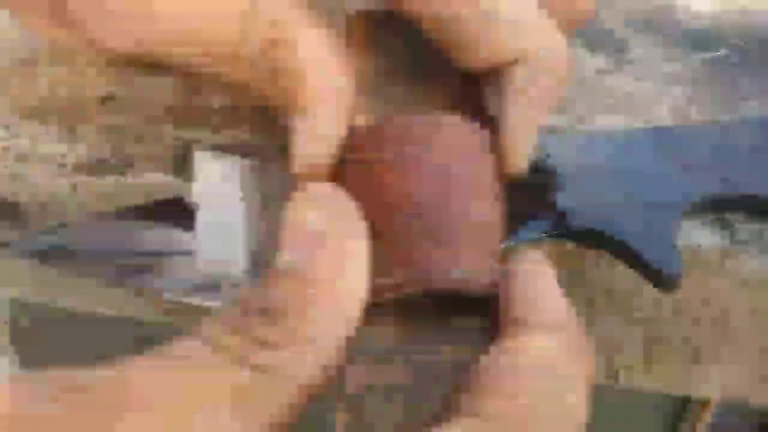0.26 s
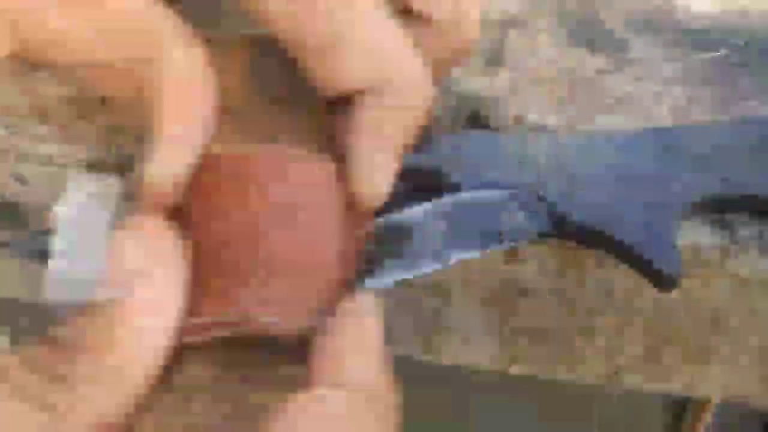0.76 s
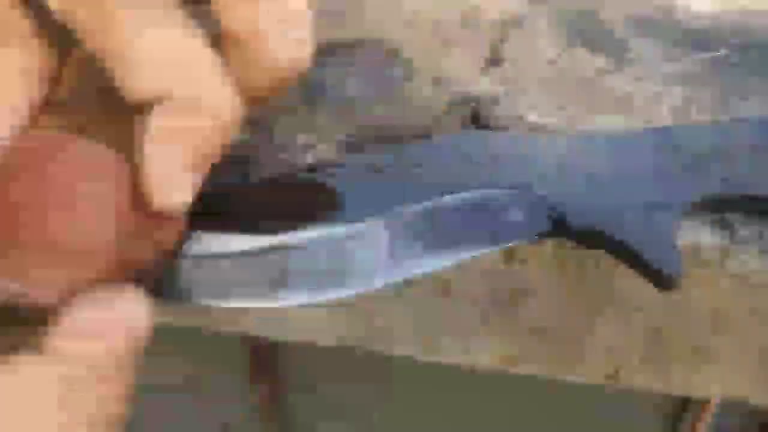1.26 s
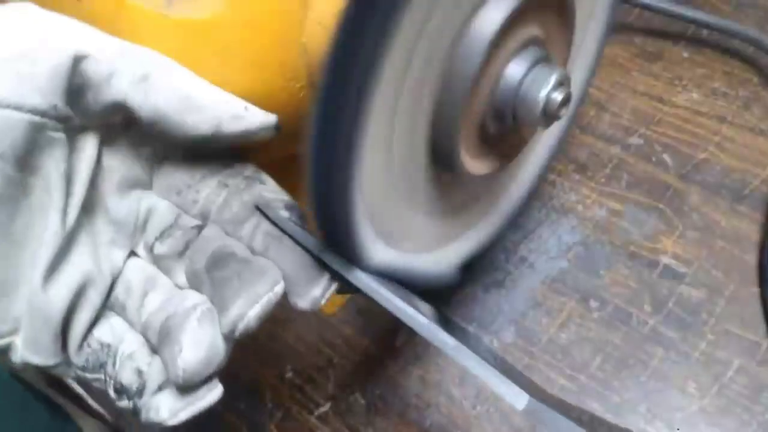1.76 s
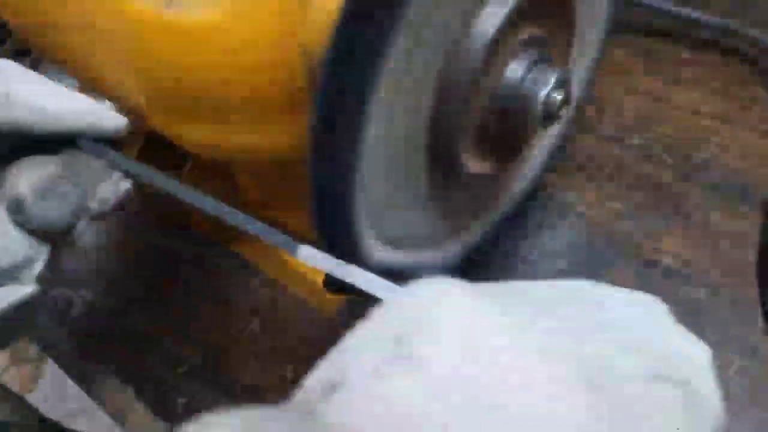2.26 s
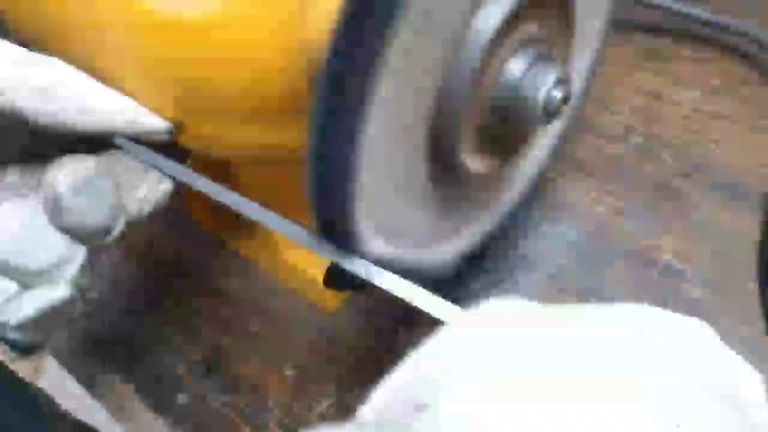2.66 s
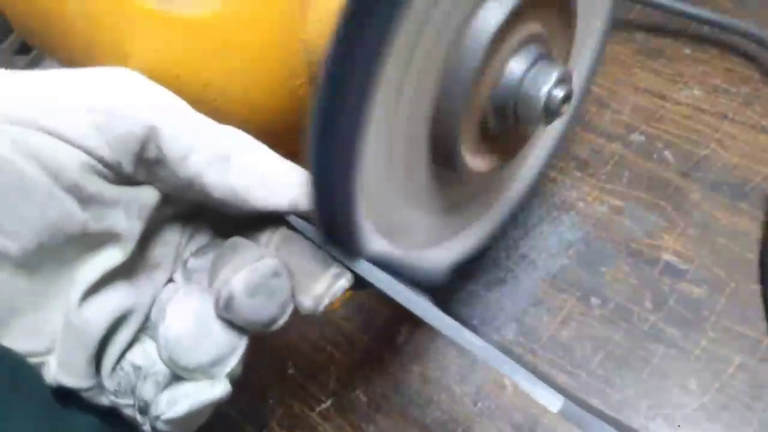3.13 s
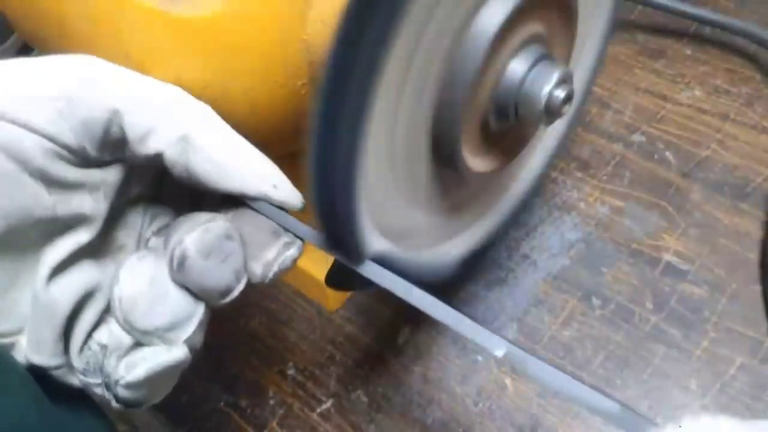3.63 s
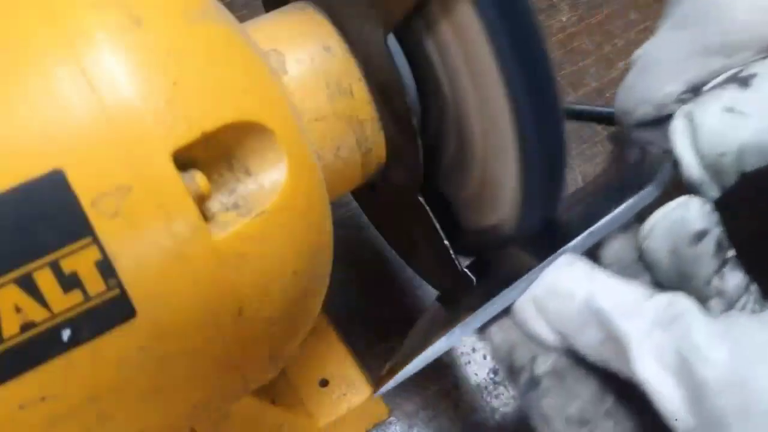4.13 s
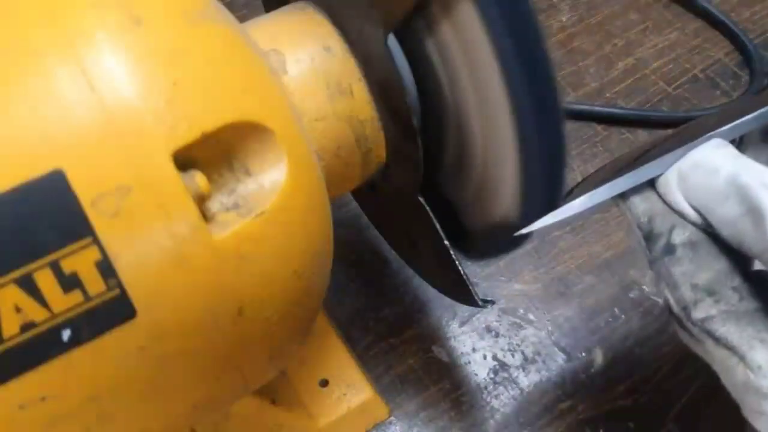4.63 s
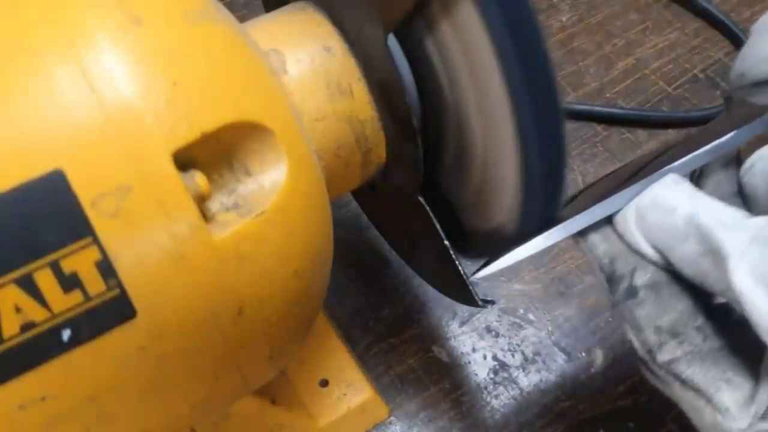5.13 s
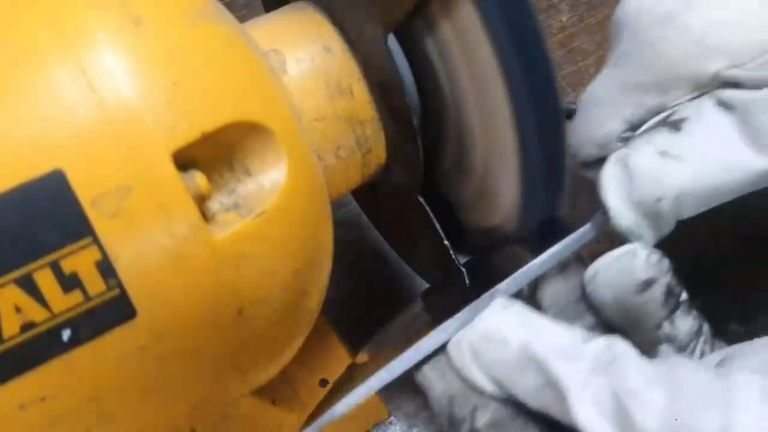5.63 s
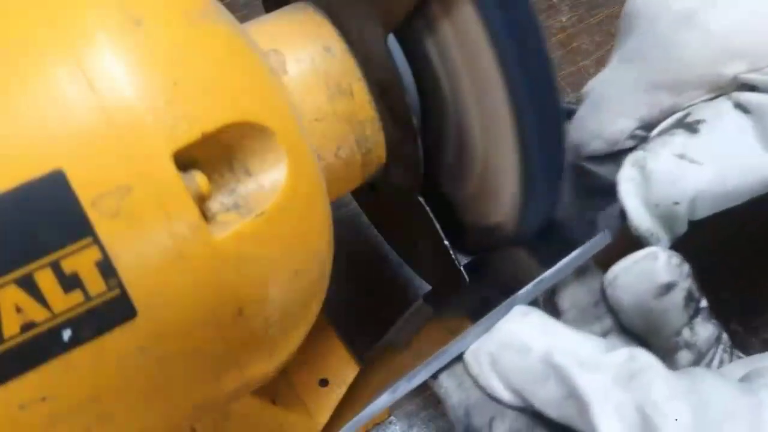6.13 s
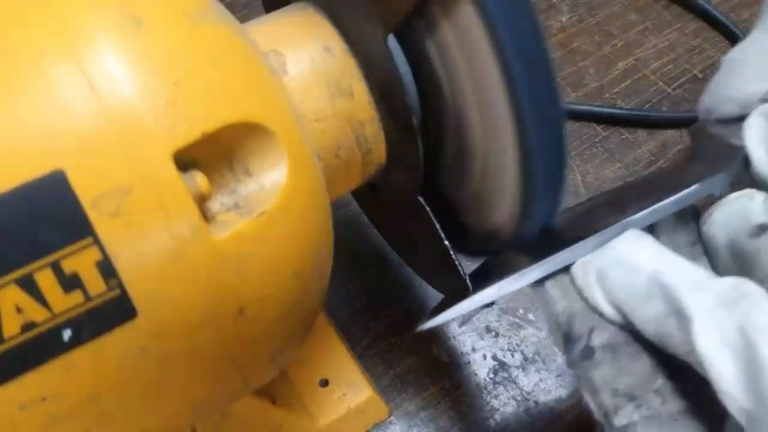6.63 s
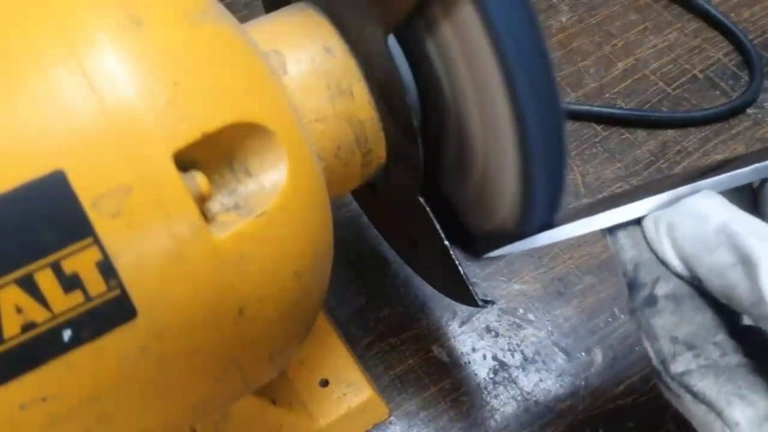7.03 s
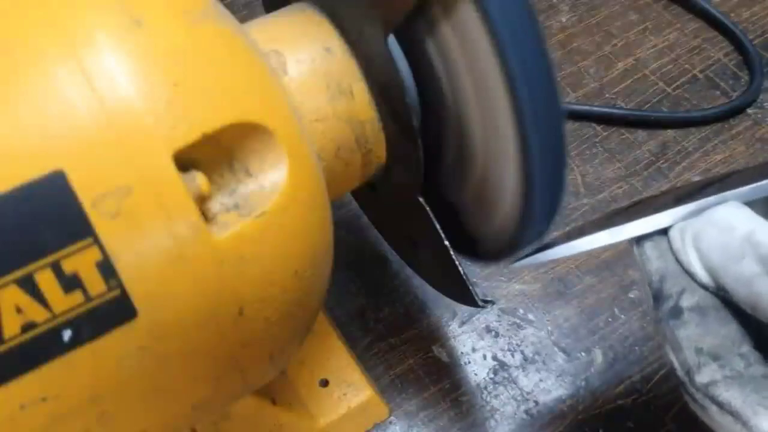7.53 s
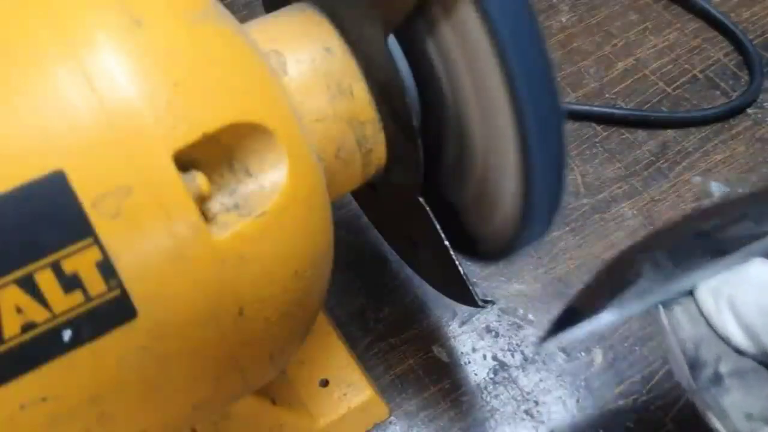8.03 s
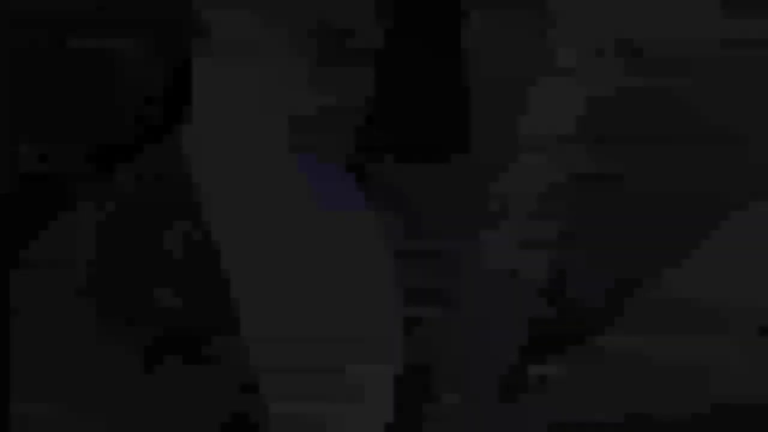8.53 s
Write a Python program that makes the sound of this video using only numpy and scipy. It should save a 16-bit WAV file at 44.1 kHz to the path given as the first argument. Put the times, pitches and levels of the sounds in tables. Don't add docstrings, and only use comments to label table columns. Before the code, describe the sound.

From 0 to 1.46 seconds, sandpaper is rubbed very fast along a clamped steel blade: short, dry, high hissing strokes about every 0.05 seconds, stopping sharply, with small catches and a faint low yard murmur. At 1.48 it cuts to a close bench microphone beside a buffing wheel. The blade drags on it with a rough buzz repeating about 73 times a second, metallic ringing and hiss over low motor hum. Pressure eases near 2.5, returns brighter by 2.85, and drops briefly at 3.95. At 4.0 the sound jumps louder, from behind the wheel, with a hard knocking start, then a singing edge; it dips near 5.3 and swells lower and stronger from 5.7. The blade lifts about 7.5, with low bumps near 7.6 to 7.7. The wheel idles with hum, air and faint whine until 8.5. Quiet outdoor air follows, with wind thumps on the left at 8.64 and 8.76.

```python
import sys
import numpy as np
from scipy import signal
from scipy.fft import irfft
from scipy.io import wavfile
from scipy.ndimage import uniform_filter1d

SR = 44100
rng = np.random.default_rng(int(sys.argv[2]) if len(sys.argv) > 2 else 0)


def generate_wav(signal):
    frames = np.transpose(np.atleast_2d(signal))
    scaled = np.clip(frames, -1, 1) * 32767
    pcm = np.round(scaled).astype(np.int16)
    wavfile.write(sys.argv[1], SR, pcm)


def attenuation_scalar(level_db):
    decades = np.asarray(level_db, float) / 20
    return 10 ** decades


N = 387193
T = np.arange(N) / SR
CHANGE_S = 4.007
PORT_LAG_S = 3.5e-5


def evened(x, axis=None):
    return x / np.sqrt(np.mean(x ** 2, axis, keepdims=True) + 1e-20)


def read(points, hz):
    f, value = np.transpose(points)
    return np.interp(np.log(hz + 1), np.log(f + 1), value)


def bins_and_frames(size):
    hop = size // 4
    return np.fft.rfftfreq(size, 1 / SR)[:, None], np.arange(-(-N // hop) + 1) * hop / SR


def modes(rows, hz, widen):
    return sum(attenuation_scalar(db) ** 2 / (1 + (2 * (hz - f) / (w + widen)) ** 2) ** 2 for f, w, db in rows)


def patches(shape, bins, frames):
    chance = rng.standard_normal(shape[::-1]).T
    return evened(uniform_filter1d(uniform_filter1d(chance, bins, 0), frames, 1))


def blended(x, t, size):
    sides = (t < CHANGE_S - .02, t >= CHANGE_S - .02)
    return np.concatenate([uniform_filter1d(x[..., m], size, mode="nearest") for m in sides], -1)


def white():
    return rng.standard_normal((N, 2)).T


def heard(x, gain, same, pan_db, size):
    a, b = signal.stft(x, nperseg=size, noverlap=size * 3 // 4)[2]
    same = np.clip(same, -1, 1)
    hz = bins_and_frames(size)[0]
    lag_s = PORT_LAG_S * np.exp(-hz / 15000)
    twist = 1.2 * np.sin(hz / 420) * (hz > 2500)
    left = a * np.exp(-2j * np.pi * hz * lag_s + 1j * twist) * attenuation_scalar(pan_db / 2)
    right = (same * a + np.sqrt(1 - same ** 2) * b) * attenuation_scalar(-pan_db / 2)
    z = np.array([left, right]) * gain
    return signal.istft(z, nperseg=size, noverlap=size * 3 // 4)[1][:, :N]


# (pitch_hz, level_db per Hz)
OPEN_AIR = [(18, -28), (30, 5.5), (199, -8.5), (554, -23), (632, -26.5), (801, -36), (937, -21),
            (1190, -29), (1430, -41), (1900, -37), (2300, -44.5), (16000, -58)]
# (peak_s, level_db)
RUSTLES = [
    (8.58, -60),
    (8.71, -61),
    (8.76, -60),
]
RUSTLE_FADE = 1200


def outdoors():
    hz, t = bins_and_frames(size=512)
    air = evened(attenuation_scalar(read(OPEN_AIR, hz))) * attenuation_scalar(-53.5)
    dry_ring = evened(np.sqrt(modes([(950, 140, 3), (1260, 190, -8.5)], hz, 0)))
    rustle = dry_ring * sum(attenuation_scalar(db - RUSTLE_FADE * abs(t - s)) for s, db in RUSTLES)
    return heard(white(), air + rustle, 0.34, 7.2, size=512) * np.clip((T - 8.575) / 0.013, 0, 1)


# (centre_s, level_db, pitch_hz, length_cycles, left_right_db)
BUMPS = [
    (4.6, -61, 123, 4.6, 8),
    (7.591, -52.5, 142, 3.7, 7),
    (7.679, -45, 91, 4.4, 18),
    (7.722, -55, 109, 4.3, 14),
    (8.388, -51, 92, 6.6, 19),
]
# (centre_s, level_db, pitch_hz, length_cycles)
GUSTS = [
    (8.594, -50, 130, 2),
    (8.619, -38, 90, 2.5),
    (8.63, -32, 100, 1.5),
    (8.6388, -26, 190, 1.3),
    (8.6405, -43, 330, 1.8),
    (8.655, -45, 130, 2.5),
    (8.673, -49, 95, 3),
    (8.759, -33, 105, 3.5),
    (8.76, -46, 330, 3),
    (8.78, -42, 100, 2),
]
WIND_LEFT_DB, WIND_FULL_DB = 35, -38.5


def bumps():
    out = np.zeros((2, N))
    gusts = [(*w, WIND_LEFT_DB + min(w[1] - WIND_FULL_DB, 0)) for w in GUSTS]
    for s, db, hz, cycles, pan_db in BUMPS + gusts:
        u = (T - s) * hz
        swing = -2 * np.exp(-(2.5 * u / cycles) ** 2) * np.cos(2 * np.pi * u)
        out += attenuation_scalar(db - pan_db * np.c_[[0, 1]]) * swing
    return out


# (time_s, speed_turns_per_s)
SPEED = [(1.55, 73.6), (1.85, 73.35), (2.17, 72.3), (2.45, 73.9), (2.65, 73.0), (3, 71.8), (3.17, 72.7),
         (3.35, 72.0), (3.55, 71.6), (3.87, 70.0), (4.08, 71.1), (4.5, 72.8), (4.8, 73.95), (5.5, 73.75),
         (5.85, 72.55), (6.1, 73.2), (6.4, 73.4), (7.45, 75.05)]
IDLE_SPEED = 75.4


def turns():
    return np.cumsum(np.interp(T, *np.transpose(SPEED + [(7.65, IDLE_SPEED)]))) / SR


# (pitch_hz, likeness)
PLACE_SAME = [(60, 0.8), (180, 1), (550, 0.54), (1650, 0.088), (4970, 0.26), (15000, 0.24)]
# (shaft_order, level_db)
HUM = [(1, 3.5), (2, -5), (3, -16.5), (4, -5), (5, -11.5), (6, -7), (7, -22.5), (8, -15), (10, -19),
       (11, -22.5), (12, -12)]
# (time_s, hum_db, rush_db, hum_left_right_db, bench_buzz_db)
MOTOR = [
    (1.47, -85, -73, 2, -80),
    (1.62, -66.5, -57, -2.5, -70.5),
    (7.3, -63.5, -58.5, 1.5, -68.5),
    (8.3, -61.5, -60.5, 6, -76.5),
    (8.42, -59, -57, 4, -70.5),
]
# (pitch_hz, level_db per Hz)
RUSH = [(30, -2), (100, -0.5), (300, -3.5), (600, -4.5), (1200, -8.5), (3000, -10.5), (5000, -8.5),
        (6000, -17), (8500, -19), (11000, -19.5), (15500, -9), (16000, -39)]
# (pitch_hz, left_right_db)
RUSH_VIEW = [(60, -15), (110, 18), (200, -2.5), (380, 1), (700, 7.5), (1290, 3.5), (2380, 2.5), (4400, 1.5),
             (8120, 35), (15000, 12.5)]
# (pitch_hz, width_hz, level_db)
WHINE = [(7620, 330, -61), (5340, 200, -70), (6480, 120, -73), (9240, 180, -76), (12640, 390, -67.5)]
FREE_S, FREE_BUZZ_DB = 7.2, 16


def motor():
    s, hum_db, rush_db, pan_db, buzz_db = np.transpose(MOTOR)
    turn, hum = turns(), 0
    freed = FREE_BUZZ_DB * np.clip((T - FREE_S) / 0.14, 0, 1)
    for k, db in HUM:
        waver_db = 1.2 if k == 1 else 3.5
        waver = attenuation_scalar(waver_db * evened(uniform_filter1d(rng.standard_normal(N), size=12000)))
        level_db = np.interp(T, s, hum_db if k == 1 else buzz_db) + db + 4.6 * (k > 1)
        level_db = level_db + freed * ((k == 3) + .5 * (k == 5))
        hum += attenuation_scalar(level_db) * waver * np.sin(2 * np.pi * (k * turn + rng.random()))
    hum = np.sqrt(2) * hum * attenuation_scalar(np.interp(T, s, pan_db) * np.c_[[.5, -.5]])

    hz, t = bins_and_frames(size=1024)
    air_db = np.interp(t, s, rush_db)
    rush = evened(attenuation_scalar(read(RUSH, hz))) ** 2 * attenuation_scalar(air_db) ** 2
    whine = sum(evened(np.sqrt(modes([m], hz, 0))) ** 2 * attenuation_scalar(m[2]) ** 2 for m in WHINE)
    whine = whine * attenuation_scalar(air_db + 55.0) ** 2
    whine *= np.interp(t, [CHANGE_S, CHANGE_S + .01, 8.48, 8.52], [0.037, 1.0, 0.93, 0.021])
    gain = np.sqrt(rush + whine) * attenuation_scalar(2.0 * patches((len(hz), len(t)), 6, 12))
    gain *= attenuation_scalar(4.0 * np.minimum(patches((len(hz), len(t)), 3, 30), .5) * (hz < 450))
    air = heard(white(), gain, read(PLACE_SAME, hz), read(RUSH_VIEW, hz), size=1024)
    return (hum + air) * np.interp(T, [8.495, 8.53, 8.578, 8.584, 8.63], [1, .5, .4, .12, 0])


# (pitch_hz, level_db per Hz)
YARD = [(18, -68), (30, -18), (128, 10.5), (241, 17), (318, 12), (407, 3), (599, 5), (744, 0), (1200, 8.5),
        (1560, -34), (2640, -120)]
YARD_DB = -66


def yard():
    hz, t = bins_and_frames(size=2048)
    colour = evened(attenuation_scalar(read(YARD, hz)))
    return attenuation_scalar(YARD_DB) * heard(white(), colour, read(PLACE_SAME, hz), 2.3, size=2048)


# (start_s, length_s, level_db, bench_share_db, weakening_db)
STROKES = [(-0.02, 0.041, -34, -27, 10), (0.026, 0.047, -33.5, -28, -1), (0.08, 0.043, -33.5, -29.5, 5),
           (0.133, 0.046, -35, -28, 3), (0.181, 0.052, -33, -32, 4), (0.237, 0.049, -35.5, -25.5, 2),
           (0.288, 0.052, -33.5, -32, 4), (0.349, 0.046, -33.5, -25, 4), (0.396, 0.053, -35, -31, -1),
           (0.453, 0.048, -35.5, -20.5, 7), (0.501, 0.051, -37, -26, 1), (0.557, 0.048, -36, -19, 8),
           (0.606, 0.045, -35, -30, 1), (0.659, 0.046, -34, -22.5, 6), (0.711, 0.04, -35, -36, 2),
           (0.761, 0.048, -31.5, -25, -2), (0.815, 0.038, -33.5, -36, 1), (0.867, 0.052, -32, -32, 2),
           (0.923, 0.038, -32, -49, 3), (0.971, 0.052, -32.5, -35, 6), (1.026, 0.037, -33.5, -39, -5),
           (1.08, 0.046, -35.5, -34, 1), (1.129, 0.044, -33, -31.5, 6), (1.174, 0.049, -34, -33.5, -2),
           (1.228, 0.048, -34, -35, 5), (1.281, 0.051, -33.5, -30, 6), (1.33, 0.051, -32, -34, 2),
           (1.385, 0.045, -34.5, -25.5, 1), (1.435, 0.019, -31, -44, 3)]
# (pitch_hz, level_db per Hz)
PAPER = [(600, -76), (1100, -41), (1700, -33), (2500, -41.5), (4800, -11), (6300, -7), (7500, 1),
         (8300, 3.5), (9300, 8.5), (10600, 3), (12500, -4), (13600, -2.5), (16000, -7)]
# (pitch_hz, width_hz, level_db)
BENCH = [(1680, 200, 0.5), (2630, 950, 4.5), (3720, 880, 3), (4820, 720, 6.5)]
# (time_s, left_right_db)
HAND = [(0.05, 10), (0.19, 8), (0.27, 5.5), (0.56, 5), (0.78, 5.5), (0.95, 9), (1.45, 8.5)]
# (time_s, level_db)
SNAGS = [
    (0.391, -30),
    (0.6, -34),
    (0.701, -30),
    (1.244, -31),
    (1.45, -29),
    (1.4565, -27),
]
BITE_S, STOP_S, SNAG_S = 0.01, 0.002, 0.0012


def sanding():
    hz, t = bins_and_frames(size=256)
    body = np.full(N, attenuation_scalar(-66.))
    hiss = sum(attenuation_scalar(db) * np.exp(-((T - s) / SNAG_S) ** 2) for s, db in SNAGS)
    for s, length, db, body_db, weaken_db in STROKES:
        end = s + length
        level = attenuation_scalar(np.interp(T, [s, end], [db + weaken_db / 2, db - weaken_db / 2]))
        level *= np.clip((T - s) / BITE_S, 0, 1) ** 1.6
        level *= np.clip((end - T) / (STOP_S * (1 + max(weaken_db, 0) / 4)), 0, 1)
        hiss, body = hiss + level, body + level * attenuation_scalar(body_db)
    bunches = attenuation_scalar(2.1 * evened(uniform_filter1d(rng.standard_normal(N), size=40)))
    grit = white() * evened(bunches)
    same, pan_db = read(PLACE_SAME, hz), np.interp(t, *np.transpose(HAND))
    uneven = patches((len(hz), len(t)), 5, 16)
    tear = evened(attenuation_scalar(read(PAPER, hz))) * attenuation_scalar(2.3 * uneven)
    bench = np.sqrt(modes(BENCH, hz, 120) + attenuation_scalar(-18.0) ** 2 * (hz < 5000))
    knock = evened(bench) * attenuation_scalar(2.4 * uneven[:, ::-1])
    out = attenuation_scalar(1.0) * hiss * heard(grit, tear, same, pan_db, size=256)
    out += attenuation_scalar(12.0) * body * heard(grit[::-1], knock, same, 7.1, size=256)
    return (out + yard()) * np.interp(T, [1.457, 1.459, 1.47], [1, .01, 0])


# (pitch_hz, likeness)
MEMORY = [(300, 0.84), (1100, 0.946), (2500, 0.76), (5500, 0.61), (9000, 0.6), (13000, 0.57)]
LOBES = [11, 12, 13, 14, 15]
LOBES_DB = [3.5, -2.5, 2, 1, 1]


def rim(spot_db, size=2048):
    turn = turns()
    count, orders = int(turn[-1]) + 2, 260
    fresh = rng.standard_normal((count, 2, orders, 2)) @ [1, 1j]
    keep = np.clip(read(MEMORY, IDLE_SPEED * np.arange(orders)), 0, .995)
    for k in range(1, count):
        fresh[k] = keep * fresh[k - 1] + np.sqrt(1 - keep ** 2) * fresh[k]
    fresh /= abs(fresh) ** (0.85 * keep ** 4)
    fresh[..., LOBES] *= attenuation_scalar(np.array(LOBES_DB))
    pattern = irfft(fresh, size).transpose(1, 0, 2).reshape(2, -1)
    rough = evened(np.array([np.interp(turn * size, np.arange(len(p)), p) for p in pattern]))
    spot = attenuation_scalar(np.clip(spot_db, 0, 11) * np.exp(-((turn % 1 - .5) / .09) ** 2))
    return rough * spot / np.sqrt(uniform_filter1d(spot ** 2, size=1800))


# (time_s, pressure_db)
PASSES = [
    [(1.49, -49), (1.6, -39), (1.95, -39), (2.33, -35.5), (2.41, -44), (2.54, -46.5)],
    [(2.7, -41.5), (2.85, -38), (3.05, -36.5), (3.2, -36.5), (3.7, -38.5), (3.908, -36.5), (3.95, -53),
     (3.993, -52)],
    [(4.012, -37), (4.35, -35.5), (4.6, -35.5), (4.9, -35.5), (5.15, -35.5), (5.3, -40), (5.45, -37.5),
     (5.62, -38.5)],
    [(5.74, -34.5), (5.9, -35), (6.4, -34), (6.7, -36), (6.95, -36), (7.17, -40.5), (7.35, -39.5),
     (7.49, -37), (7.54, -56)],
]
LIFT_S, LIFT_DB = 7.62, -86
# (start_s, modes as (pitch_hz, width_hz, level_db))
SIDE_GRIPS = [
    (1.48, [(940, 28, -5), (1370, 40, -14), (1810, 37, -6.5), (3170, 87, -6), (3900, 67, -6), (6480, 300, -8), (9130, 60, -4), (9930, 150, -3.5)]),
    (1.8, [(950, 30, -7.5), (1150, 32, -11), (1620, 35, -16), (2800, 73, -9), (3170, 60, -16), (6900, 300, -9), (7460, 150, -8), (10050, 150, -8)]),
    (2.0, [(950, 11, -4), (715, 91, -24), (1300, 33, -17), (1660, 40, -11), (2800, 98, -8), (5090, 300, -12), (7300, 280, -11)]),
    (2.38, [(770, 73, -16), (1620, 80, -6), (2780, 120, -15), (3350, 100, -8), (5300, 300, -9)]),
    (2.59, [(950, 130, -4.5), (1320, 40, -1.5), (1670, 34, -5.5), (2310, 60, -9), (5240, 300, -4), (8400, 150, -11)]),
    (2.85, [(925, 99, -9), (720, 200, -16), (1320, 40, -16), (2500, 140, -6), (3980, 150, -8), (8300, 300, -7), (9410, 100, -8), (11900, 300, -6)]),
              (3.17, [(1010, 33, -9), (1784, 40, -1.5), (2780, 80, -10), (3220, 60, -13), (4000, 130, -3), (5210, 147, -4), (6480, 150, -3), (11700, 400, -11)]),
    (3.35, [(1024, 36, -5), (1810, 26, -1.5), (2400, 46, -7), (2670, 80, -13), (3250, 47, -2), (4090, 200, -0.5), (7430, 150, -5), (11900, 300, -5)]),
    (3.6, [(950, 75, -7), (830, 88, -11), (700, 140, -11), (1630, 25, -9.5), (2220, 90, -4.5), (3120, 110, -13), (3900, 170, -6), (5240, 250, -4.5)]),
]
# (start_s, modes as (pitch_hz, width_hz, level_db))
BACK_GRIPS = [
    (3.997, [(930, 300, -12), (1300, 50, -8.5), (2170, 78, -0.5), (2350, 260, 3.5), (2800, 180, -1.5), (3270, 280, -2.5), (6640, 400, -14)]),
    (4.28, [(940, 230, -3), (1570, 50, -12.5), (2150, 71, -6), (2360, 210, -2), (2820, 100, -0.5), (5360, 300, -18)]),
    (4.55, [(765, 30, -11.5), (960, 28, -6), (1330, 27, -14), (1480, 30, -24), (2200, 30, -9), (2835, 120, -2), (5240, 260, -3), (8460, 67, -9)]),
    (4.9, [(810, 30, -10), (985, 30, -11), (1410, 50, -10.5), (2210, 30, -7), (2860, 150, -2), (5360, 110, 0.5), (6700, 60, -4), (8220, 40, -1.5)]),
    (5.25, [(980, 30, -14), (1280, 57, -9), (2200, 40, -6.5), (2720, 120, -5.5), (5290, 100, -1.5), (6800, 60, -0.5), (8300, 40, -8)]),
              (5.66, [(950, 49, 4), (1254, 44, 1.5), (1540, 40, -4), (1870, 40, -8.5), (2260, 270, -2.5), (2750, 120, -6), (5250, 80, -7), (6350, 150, -6)]),
    (5.9, [(950, 20, -0.5), (820, 37, -9), (1575, 46, -9), (1920, 40, -10.5), (2150, 120, -6), (2790, 120, -6), (5340, 190, -6.5), (6710, 140, -2.5)]),
    (6.35, [(821, 41, -6), (950, 35, -4), (1930, 40, -10), (2170, 49, -8), (2830, 120, -3), (5330, 88, -4.5), (6370, 150, -4), (7870, 150, -7.5)]),
    (6.7, [(930, 97, 1.5), (784, 70, 0), (2100, 50, -24), (2880, 74, -4.5), (3180, 60, -13), (5400, 68, -2.5), (6580, 100, -5), (7760, 150, -5)]),
    (7.0, [(917, 74, -4), (1800, 50, -9), (2900, 80, -3), (3150, 60, -3.5), (5440, 73, -6)]),
    (7.27, [(1090, 100, -11), (870, 100, -11), (2000, 90, -6.5), (2210, 44, -5), (2800, 92, -10), (7160, 300, -8), (9600, 200, -11)]),
]
# (flexing_db, ringing_db, edge_singing_db, rim_hiss_db)
SHARES = [(-5, -4, -0.5, -1.5), (-7, -3.5, -1.5, -3.5), (-4.5, -4, -5, -7), (-8.5, -4, -4, -5.5),
          (-4.5, -1, -1, -3.5), (-8, -5, -4.5, -2), (-10, -6, -3.5, -2), (-5.5, -2, -2.5, -1.5),
          (-9.5, -4, -3, -1.5), (-9, 3.5, -1, -3), (-8.5, -0.5, -2.5, -4.5), (-9.5, -2, -2, -1.5),
          (-11.5, -6, -3.5, -4), (-9, -2.5, -3.5, -4.5), (-9, -1.5, -3.5, -5.5), (-8.5, -1.5, -3, -4.5),
          (-7.5, -2.5, -3.5, -4), (-6, -3, -3.5, -4.5), (-7, -3, -3, -3), (-7.5, -3, -3, -1.5)]
SPLITS_HZ = [575, 1600, 4200, 7500]
# (pitch_hz, level_db per Hz)
RIM = [(260, -48), (450, -12.5), (644, -8.5), (950, -14), (1190, -4), (1360, -6.5), (2430, -8.5),
       (2870, -3.5), (4360, -3), (5300, -2), (14400, -6), (15300, -2), (16000, -39)]
# (start_s, end_s, pitch_hz, width_hz, depth_db)
DIPS = [(1.55, 1.85, 2240, 380, -13), (1.8, 2.05, 2120, 370, -10), (1.1, 2.35, 4300, 290, -7),
        (2.44, 2.54, 1360, 900, -25), (3.14, 3.2, 1880, 250, -11), (2.94, 2.9, 4500, 370, -18),
        (3.15, 3.4, 700, 230, -10), (3, 3.62, 2460, 110, -20), (3.55, 3.95, 1970, 320, -14),
        (2.47, 4.1, 4080, 220, -8), (4.0, 4.3, 1540, 250, -6), (4.52, 5.35, 1145, 240, -14.5),
        (4.9, 6.1, 1820, 290, -5), (5.7, 6.1, 1180, 170, -20), (6.6, 7.45, 2480, 180, -5),
        (6.7, 7.3, 1250, 230, -10), (6.6, 7.0, 1710, 350, -9), (7.0, 7.4, 4480, 600, -11),
        (4.5, 6.9, 650, 98, -14)]
DIP_EDGE_S = 0.09
# (pitch_hz, left_right_db)
SIDE_VIEW = [(270, 20), (450, -5.5), (740, 9), (1220, 1.5), (2010, 4), (3330, -1.5), (5500, 4), (9080, 13),
             (15000, 9)]
# (pitch_hz, likeness)
SIDE_SAME = [(60, 0.22), (180, 0.72), (550, 0.71), (1650, 0.2), (4970, 0.089), (15000, 0.19)]
# (pitch_hz, left_right_db)
BACK_VIEW = [(270, 0.5), (450, 0.61), (740, 1), (1220, 8.4), (2010, 8.5), (3330, 3.7), (5500, 1.9),
             (9080, 6), (15000, 3.5)]
# (pitch_hz, likeness)
BACK_SAME = [(60, 0.91), (180, 0.57), (550, 0.17), (1650, 0.47), (4970, 0.38), (15000, 0.071)]
BEND_DB_PER_SAG, SAG_LATE_S, USUAL_SAG = 3.0, 0.031, 3.2
RING_PER_BEND = 0.39
RING_FADE_DB_PER_S = 8.5
SPOT_DB, HARD_DB, HARD_S = 0.5, 5, 0.45


def buffing():
    hz, t = bins_and_frames(size=1024)
    back = t > CHANGE_S
    grips = SIDE_GRIPS + BACK_GRIPS
    starts = np.array([g[0] for g in grips])
    grip = np.searchsorted(starts, t + .01).clip(1) - 1

    friction = attenuation_scalar(read(RIM, hz[:, 0]) - 9.5) ** 2
    colours = np.array([modes(m, hz[:, 0], 71) + friction for _, m in grips])
    power = blended(colours[grip].T, t, size=27) * attenuation_scalar(1.2 * patches((len(hz), len(t)), 4, 30)) ** 2
    for start, end, dip_hz, width, depth_db in DIPS:
        held = np.clip(np.minimum(t - start, end - t) / DIP_EDGE_S + .5, 0, 1)
        power *= attenuation_scalar(depth_db * held * np.exp(-(2 * (hz - dip_hz) / width) ** 2)) ** 2

    ahead = np.where(abs(t - CHANGE_S) < .02, CHANGE_S + .01, t)
    s, press_db = np.transpose(sum(map(list, PASSES), []) + [(LIFT_S, LIFT_DB)])
    press = np.interp(ahead, s, press_db)
    sag = IDLE_SPEED - np.interp(ahead + SAG_LATE_S, *np.transpose(SPEED))
    bend = BEND_DB_PER_SAG * (sag - USUAL_SAG)

    flex_db, ring_db, sing_db, hiss_db = blended(np.array(SHARES, float)[grip].T, t, size=21)
    held_s = blended(abs(t - starts[grip]), t, size=21)
    ring_db = ring_db - RING_FADE_DB_PER_S * held_s * back
    above = [1 / (1 + (f / (hz + 1)) ** 16) for f in SPLITS_HZ] + [hz > 16000]
    gain = 0
    for k, db in enumerate([flex_db + bend, ring_db + RING_PER_BEND * bend, sing_db, hiss_db]):
        part = power * np.clip(above[k] - above[k + 1], 0, 1)
        gain += part / part.mean(0) * attenuation_scalar(press + db + 2.0) ** 2

    view_db = np.where(back, read(BACK_VIEW, hz), read(SIDE_VIEW, hz))
    same = np.where(back, read(BACK_SAME, hz), read(SIDE_SAME, hz))
    spot_db = SPOT_DB + HARD_DB * (T > CHANGE_S) * np.exp(-((T - CHANGE_S) / HARD_S) ** 4)
    out = heard(rim(spot_db), np.sqrt(gain) * (t < 7.63), same, view_db, size=1024)
    hush = np.interp(T, CHANGE_S - np.array([.035, .015, .0005, 0]), [0, -22, -30, 0])
    return out * attenuation_scalar(hush)


def scene():
    shop = (buffing() + motor()) * np.clip((T - 1.483) / .012, 0, 1)
    return outdoors() + bumps() + sanding() + shop


def roll_off(x):
    return signal.sosfilt(signal.butter(12, 16450, fs=SR, output="sos"), x)


def record(dry):
    thinned = signal.sosfilt(signal.butter(2, 45, "high", fs=SR, output="sos"), dry)
    edge = signal.firwin(301, 15650, fs=SR)[None]
    return roll_off(signal.oaconvolve(thinned, edge, "same"))


dry = scene()
out = record(dry)
generate_wav(out)
```